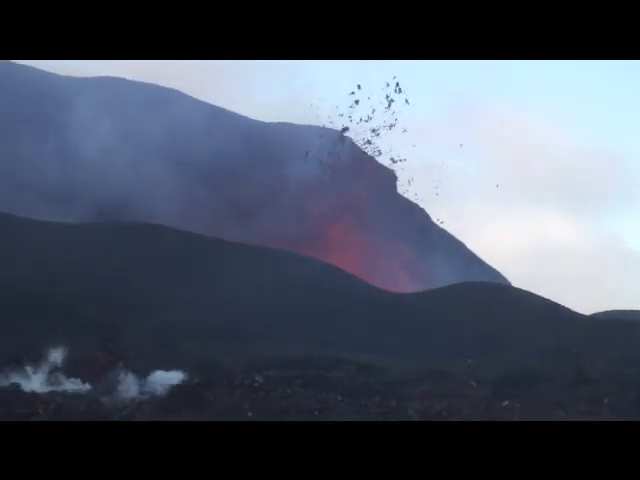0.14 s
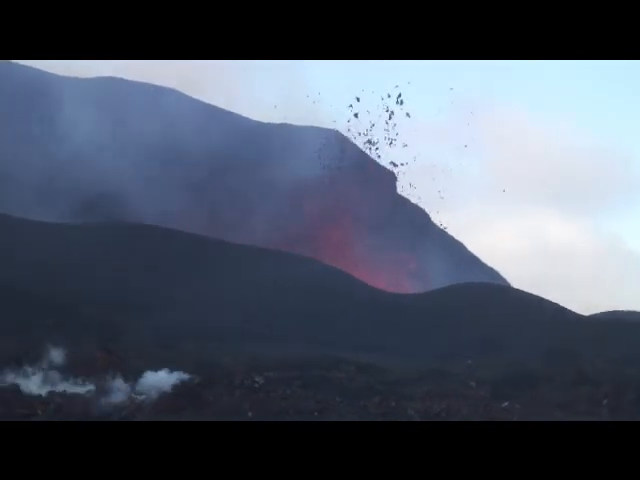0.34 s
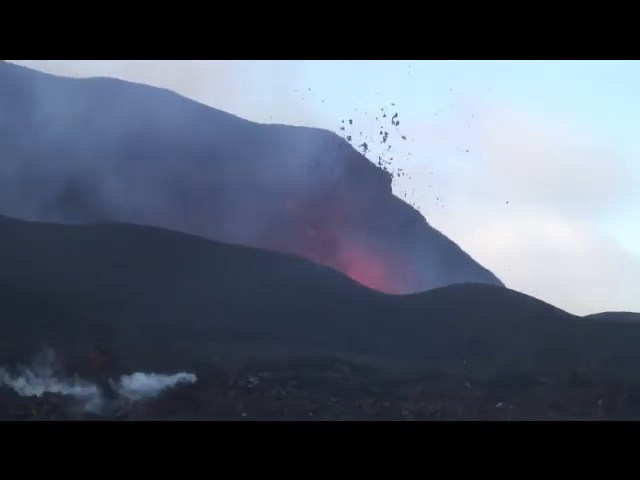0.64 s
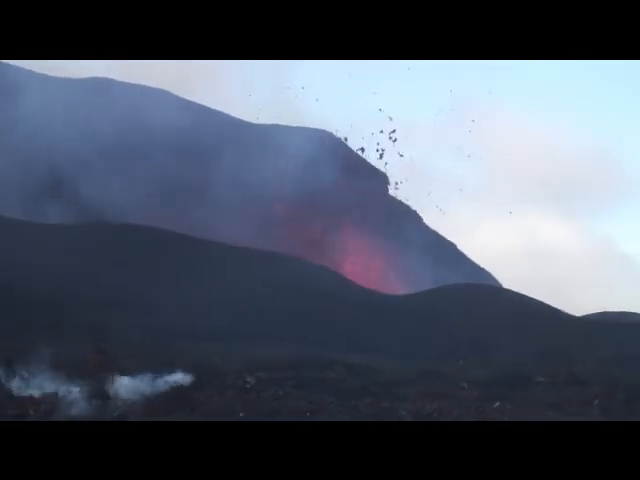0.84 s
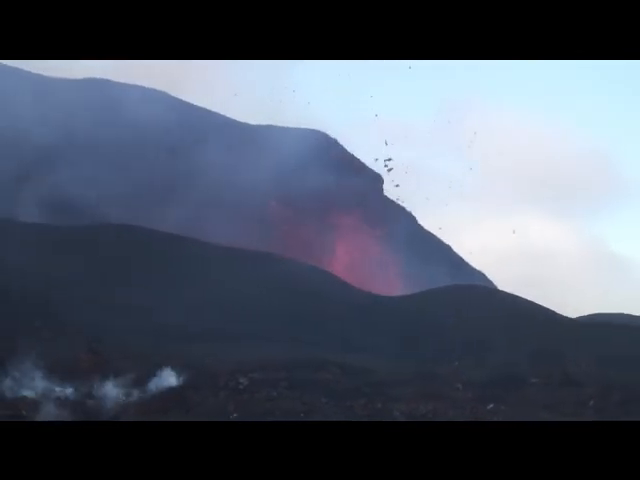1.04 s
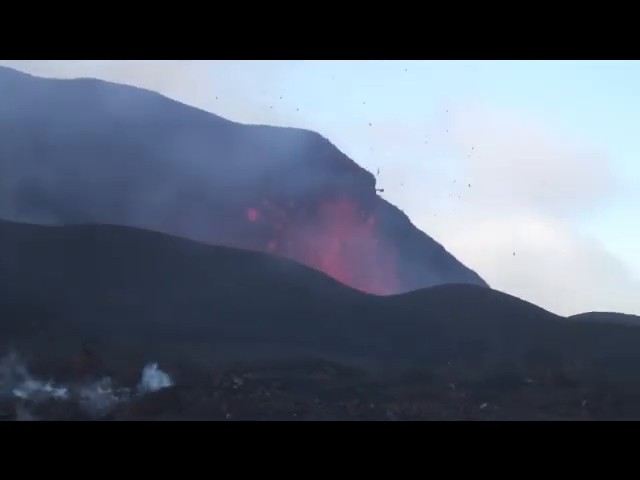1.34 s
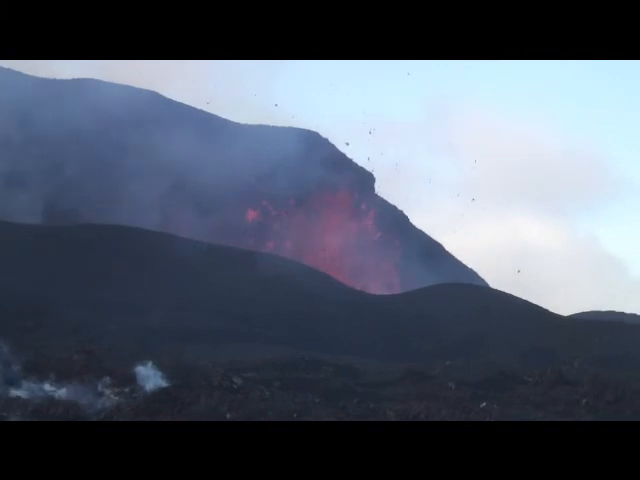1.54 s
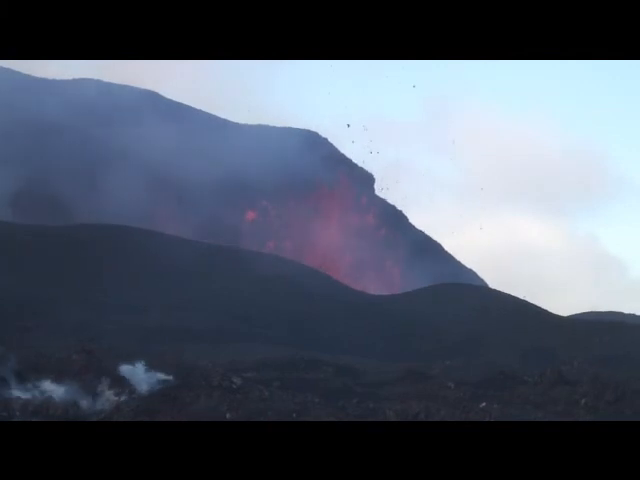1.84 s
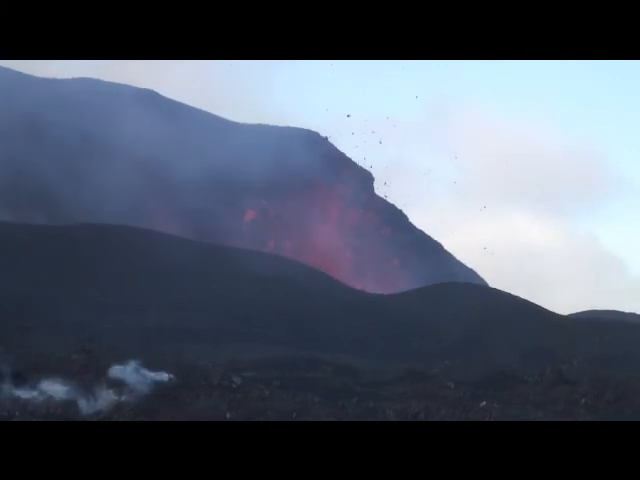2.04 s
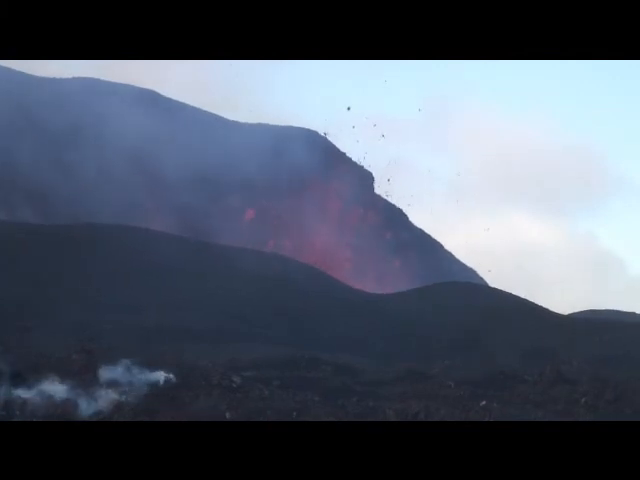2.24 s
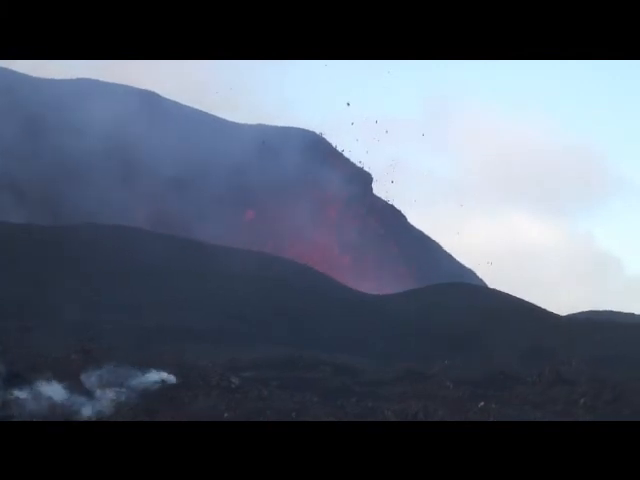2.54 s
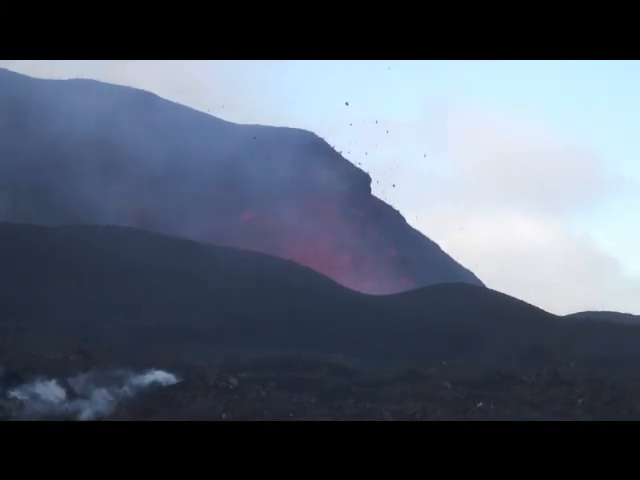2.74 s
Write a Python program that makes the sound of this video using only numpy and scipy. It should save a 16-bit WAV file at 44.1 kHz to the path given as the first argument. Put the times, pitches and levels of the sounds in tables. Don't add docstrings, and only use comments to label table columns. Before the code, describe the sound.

A distant volcanic vent roars low and mid-toned, loudest in deep surges at 0-0.5 s, with grainy lava spatter, faint hiss and wind buffeting, including a soft knock at 0.15. It eases until an abrupt silence from 1.02 to 1.27 s, returns instantly with moderate surges to 1.5, then thins. A very faint high pebble tink comes at 2.15; sharper surges swell at 2.2-2.7, peaking near 2.57, then subside.

```python
import sys
import numpy as np
from scipy import signal
from scipy.fft import rfft, irfft, next_fast_len
from scipy.io import wavfile
from scipy.ndimage import uniform_filter1d, map_coordinates

SR = 44100
rng = np.random.default_rng(int(sys.argv[2]) if len(sys.argv) > 2 else 0)


def undo_db(level):
    steps = np.asarray(level, float) / 20
    return 10 ** steps


def waveform_to_disk(signal):
    frames = np.transpose(np.atleast_2d(signal))
    scaled = np.clip(frames, -1, 1) * 32767
    samples = np.round(scaled).astype(np.int16)
    wavfile.write(sys.argv[1], SR, samples)


N = 127890


def unit(x):
    return x / np.sqrt(np.mean(x ** 2) + 1e-20)


def curves(rows):
    s, *columns = np.transpose(rows)
    return [np.interp(np.arange(N) / SR, s, column) for column in columns]


def wobble(rate):
    knots = rng.standard_normal(200 + N // 100)
    return map_coordinates(knots, [np.arange(N) * rate / SR])


def coloured(x, points):
    m = next_fast_len(N + 8192)
    f, db = np.transpose(points)
    log_f = np.log(np.fft.rfftfreq(m, 1 / SR) + 1)
    gain = undo_db(np.interp(log_f, np.log(f + 1), db))
    return unit(irfft(rfft(x, m) * gain, m)[:N])


def patchy(x, patchy_db):
    z = signal.stft(x, nperseg=512)[2]
    field = uniform_filter1d(rng.standard_normal(z.shape), size=5, axis=0)
    field = uniform_filter1d(field, size=9, axis=1)
    return signal.istft(z * undo_db(patchy_db * unit(field)), nperseg=512)[1][:N]


def turbulence(points, patchy_db):
    puffs_per_s, puff_db, puff_share = 2500, 1.5, .25
    chance, sign, size = rng.random((3, N))
    puffs = (chance < puffs_per_s / SR) * np.sign(sign - .5) * undo_db(-puff_db * np.log(1 - size))
    air = np.sqrt(1 - puff_share) * rng.standard_normal(N) + np.sqrt(puff_share) * unit(puffs)
    return coloured(patchy(air, patchy_db), points)


# t/s, jet level/dB, spatter level/dB
JET = [(0, -34, -47.5), (.3, -37.5, -49.5), (.55, -35, -50), (.75, -37.5, -48.5), (1.0, -40, -49),
       (1.3, -34.5, -49), (1.55, -37, -53), (1.7, -39.5, -53), (1.9, -40, -54.5), (2.1, -40.5, -62),
       (2.4, -39.5, -66), (2.78, -39, -61.5), (2.9, -40, -59)]
# f/Hz, level/dB per Hz
JET_COLOUR = [(70, -39), (130, -13), (253, -3), (400, 0.5), (560, -2.5), (1500, -11), (2800, -24),
              (4200, -39), (9000, -120)]
# f/Hz, level/dB per Hz
SPATTER_COLOUR = [(500, -120), (1200, -5.5), (1800, 3.5), (2750, -1), (3200, -8.5), (3780, -10.5),
                  (4050, -22.5), (6000, -120)]
# peak t/s, level/dB, rise t/s, fall t/s, sharpness (0 deep to 1 sharp)
BURSTS = [(0.053, -27.5, 0.051, 0.045, 0.05), (.14, -34.5, 0.019, 0.054, .15),
          (.37, -29, 0.038, 0.066, 0.07), (.44, -33, .05, 0.073, 0), (.95, -45.5, .15, 0.078, 0.95),
          (1.275, -39.5, 0.042, 0.01, 0.75), (1.4, -36.5, 0.042, 0.094, 0.5), (1.52, -40.5, .08, 0.1, 0.12),
          (2.23, -36, 0.062, 0.13, 0.81), (2.458, -34, 0.0068, 0.16, 0.8), (2.57, -30, 0.085, 0.073, 0.94),
          (2.68, -34, 0.053, 0.053, 0.54)]
# f/Hz, level/dB per Hz
DEEP_COLOUR = [(110, -42.5), (260, -12.5), (430, -0.5), (600, -2), (750, -6.5), (1400, -12), (2200, -25.5),
               (4300, -46), (7000, -120)]
# f/Hz, level/dB per Hz
SHARP_COLOUR = [(110, -68), (270, -8.5), (340, -2), (597, 1.5), (900, -3), (1500, -5.5), (3680, -33.5),
                (6000, -52.5), (10000, -120)]


def vent():
    t = np.arange(N) / SR
    jet_db, spatter_db = curves(JET)
    jet_db = jet_db + .7 * wobble(9) + 0.59 * wobble(30.15)
    jet = undo_db(jet_db) * turbulence(JET_COLOUR, patchy_db=-0.5)
    spatter = undo_db(spatter_db) * turbulence(SPATTER_COLOUR, patchy_db=1.9)
    deep_power, sharp_power = np.zeros((2, N))
    for s, db, rise, fall, sharpness in BURSTS:
        swell = undo_db(2 * db) * np.exp(-((t - s) / np.where(t < s, rise, fall)) ** 2)
        deep_power += (1 - sharpness) * swell
        sharp_power += sharpness * swell
    deep = np.sqrt(deep_power) * turbulence(DEEP_COLOUR, patchy_db=0.5)
    sharp = np.sqrt(sharp_power) * turbulence(SHARP_COLOUR, patchy_db=0.0)
    flutter = undo_db(0.75 * wobble(40))
    return jet + spatter + flutter * (deep + sharp)


# f/Hz, level/dB, T60 t/s
TINK = [
    (8820, 1, .12),
    (8900, -4, .3),
    (9400, -1, .07),
    (9080, -6, .35),
]


def pebble():
    t = np.clip(np.arange(N) / SR - 2.15, 0, None)
    ring = sum(undo_db(db - 60 * t / t60) * np.sin(2 * np.pi * hz * t) for hz, db, t60 in TINK)
    return undo_db(-76) * ring * (1 - np.exp(-t / .004))


# t/s, buffet level/dB, hiss level/dB
WIND = [(0, -42.5, -59), (.12, -48, -65), (.4, -47, -70.5), (.55, -54, -68), (.63, -47.5, -65.5),
        (.85, -45, -69), (.95, -51, -63), (1.01, -46.5, -68.5), (1.29, -48, -67), (1.37, -48.5, -69.5),
        (1.48, -46, -66.5), (1.6, -52.5, -72.5), (2.1, -54, -76), (2.5, -54, -82.5), (2.9, -60.5, -83.5)]
# f/Hz, level/dB per Hz
RUMBLE = [(10, -39.5), (30, -30), (50, -15.5), (90, -5), (163, -0.5), (230, -4), (400, -23.5), (700, -120)]
# f/Hz, level/dB per Hz
HISS = [(2000, -120), (3500, -0.5), (5000, -5), (7500, -8), (9500, -10), (11000, -14.5), (12900, -24),
        (13600, -120)]
# t/s, level/dB, f/Hz, width t/s
THUMPS = [
    (0.15, -36, 105, 0.015),
    (0.689, -56, 70, 0.034),
    (1.659, -48.5, 78.3, 0.014),
]


def wind():
    t = np.arange(N) / SR
    buffet_db, hiss_db = curves(WIND)
    buffet = unit(undo_db(1.1 * wobble(17)) * coloured(rng.standard_normal(N), RUMBLE))
    hiss = coloured(patchy(rng.standard_normal(N), patchy_db=1.2), HISS)
    out = undo_db(buffet_db) * buffet + undo_db(hiss_db) * hiss
    for s, db, hz, width in THUMPS:
        out += undo_db(db) * np.exp(-((t - s) / width) ** 2) * np.sin(2 * np.pi * hz * (t - s))
    return out


def scene():
    return (vent() + pebble() + wind())[None]


def band_limit(x):
    return signal.sosfilt(signal.butter(12, 13150, fs=SR, output="sos"), x)


# f/Hz, level/dB per Hz
SELF_NOISE = [(500, -120), (3000, -2), (6000, 1), (10000, -3), (12900, -0.5), (13000, -5), (15000, -120)]
# f/Hz, level/dB per Hz
REMNANT = [(60, -20), (300, 0), (2500, -2), (4500, -20), (12500, -27), (14000, -120)]


def record(dry):
    t = np.arange(N) / SR
    cut_s, back_s, fade_in_s = 1.0199, 1.2715, .0007
    remnant_db, remnant_t60, remnant_s, remnant_end_s = -66, .14, .029, .006
    x = dry + undo_db(-75.5) * coloured(rng.standard_normal(N), SELF_NOISE)
    since = np.clip(t - cut_s, 0, None)
    decay = undo_db(remnant_db - 60 * since / remnant_t60) * (t >= cut_s)
    ending = np.clip((remnant_s - since) / remnant_end_s, 0, 1)
    remnant = decay * ending * coloured(rng.standard_normal(N), REMNANT)
    back = np.exp(-np.clip(back_s - t, 0, None) / fade_in_s) * (t > (cut_s + back_s) / 2)
    mix = x * np.where(t < cut_s, 1, back) + remnant
    return band_limit(mix)


dry = scene()
out = record(dry)
waveform_to_disk(out)
```